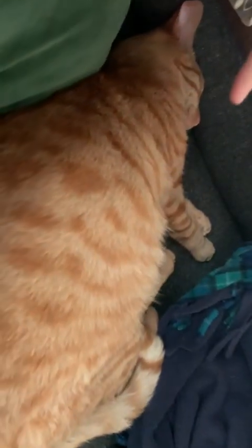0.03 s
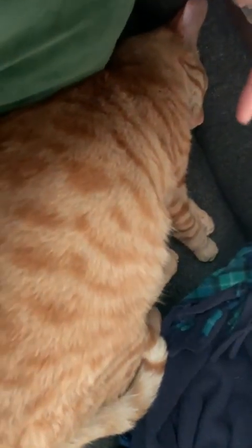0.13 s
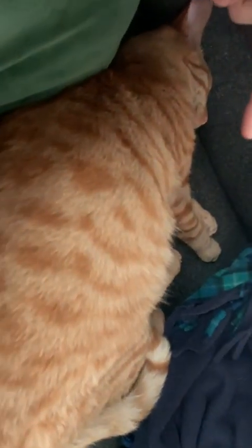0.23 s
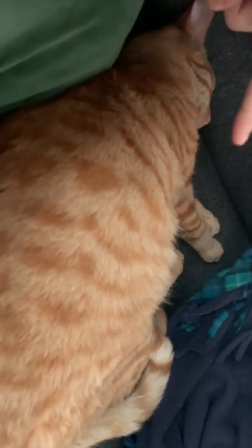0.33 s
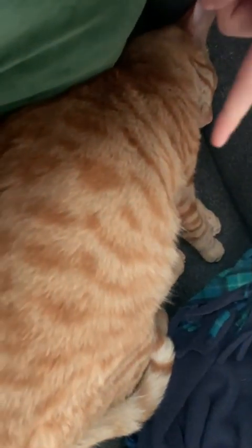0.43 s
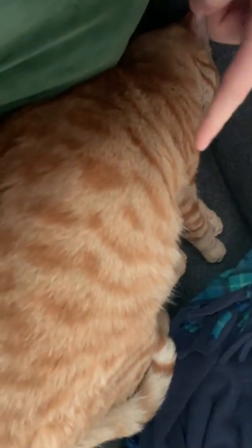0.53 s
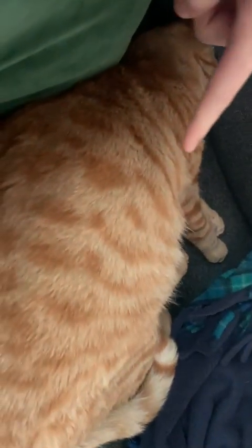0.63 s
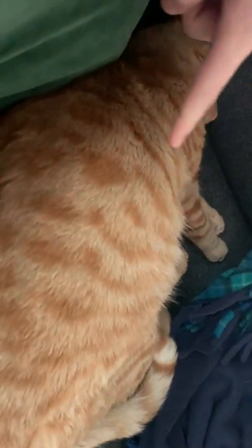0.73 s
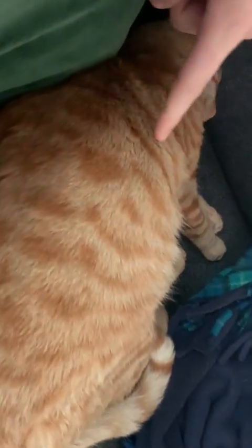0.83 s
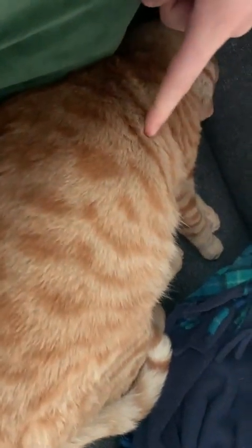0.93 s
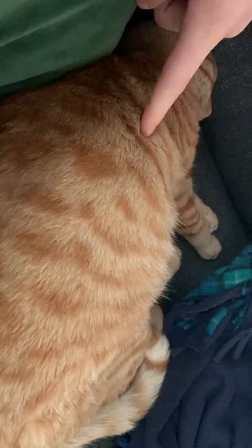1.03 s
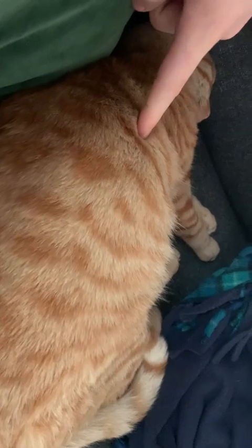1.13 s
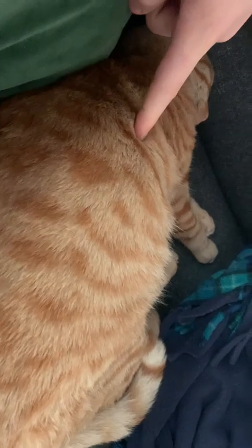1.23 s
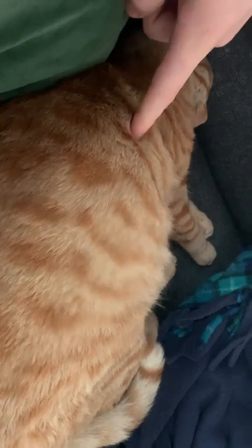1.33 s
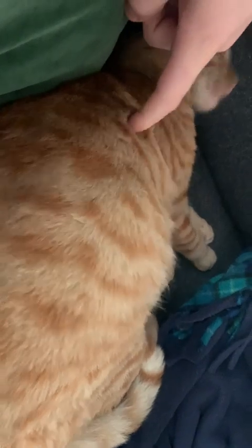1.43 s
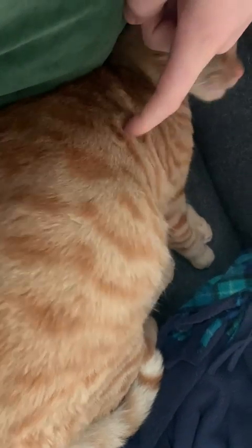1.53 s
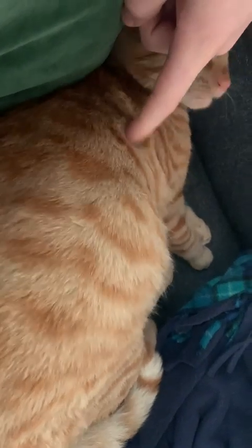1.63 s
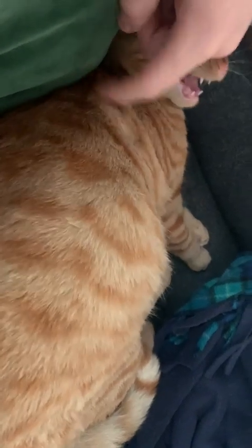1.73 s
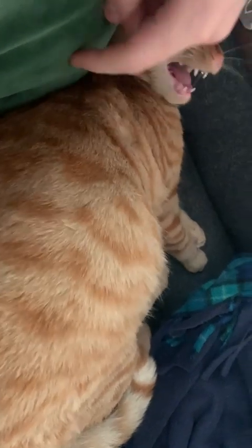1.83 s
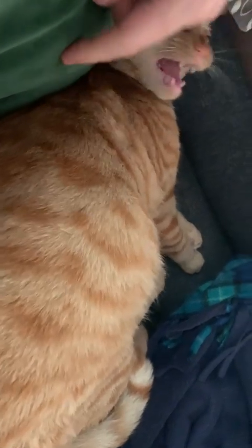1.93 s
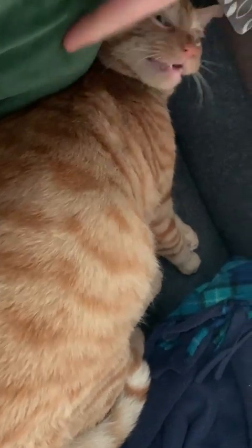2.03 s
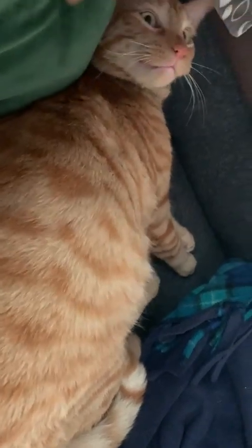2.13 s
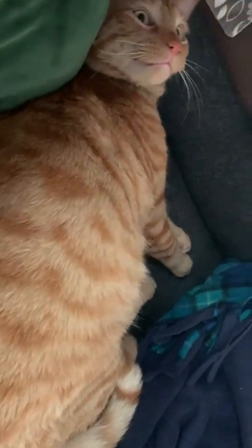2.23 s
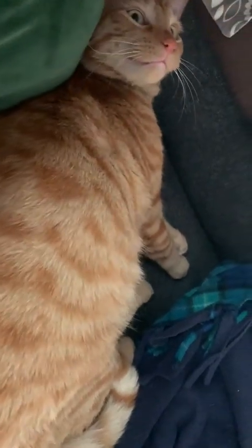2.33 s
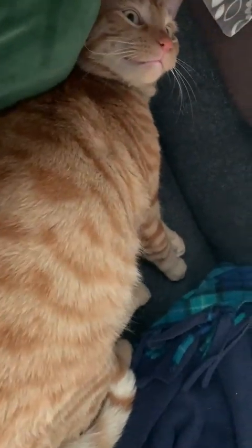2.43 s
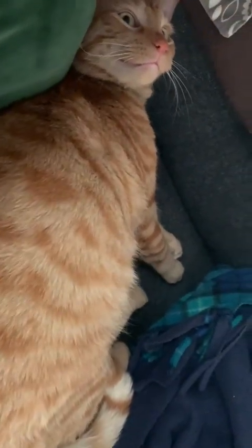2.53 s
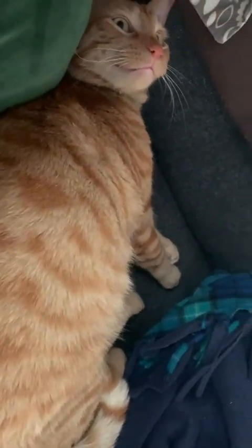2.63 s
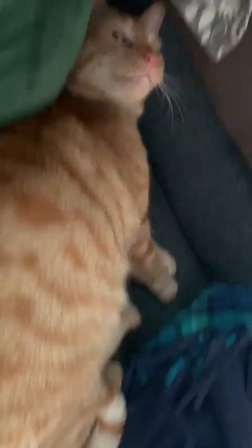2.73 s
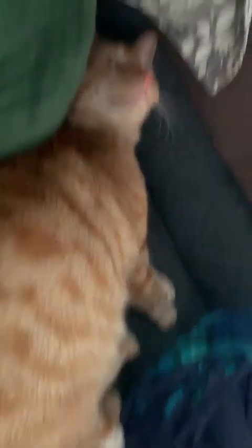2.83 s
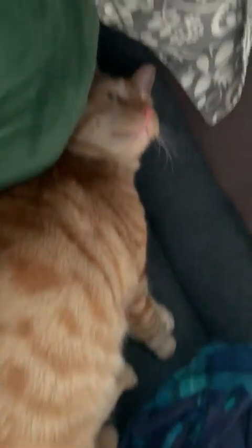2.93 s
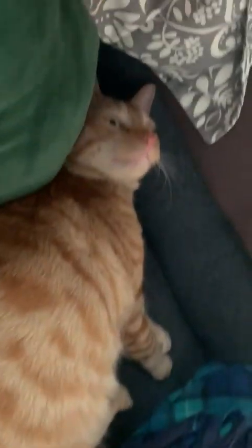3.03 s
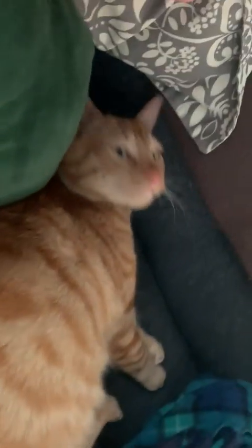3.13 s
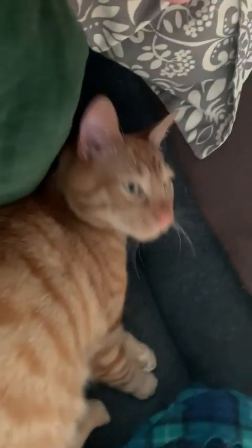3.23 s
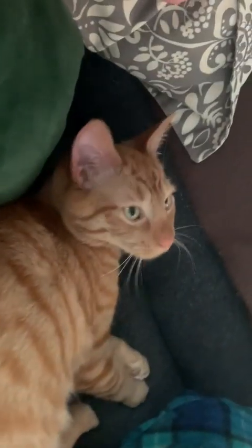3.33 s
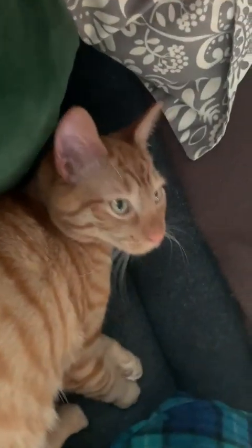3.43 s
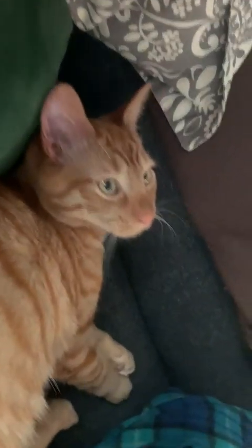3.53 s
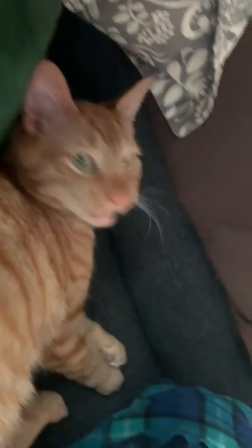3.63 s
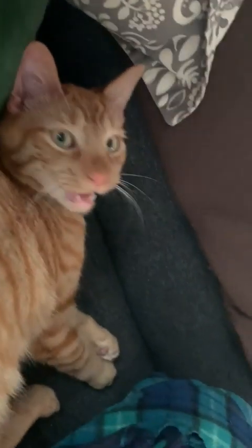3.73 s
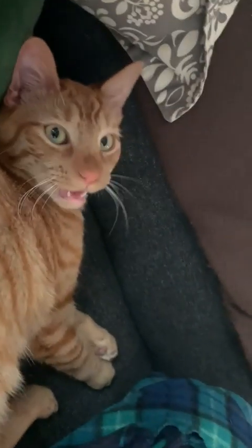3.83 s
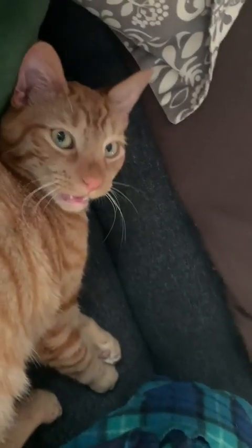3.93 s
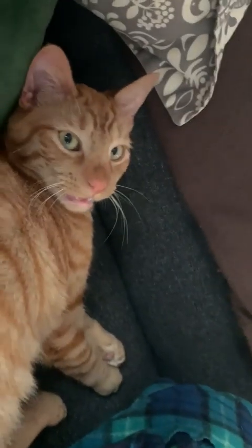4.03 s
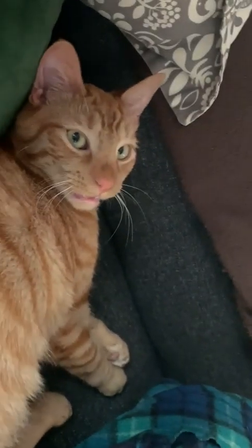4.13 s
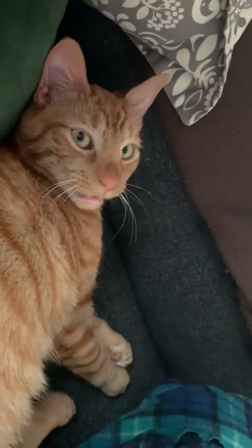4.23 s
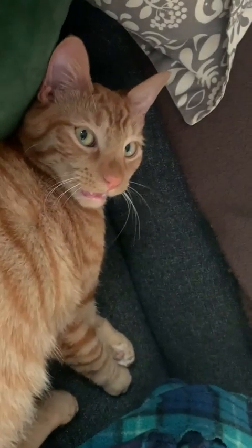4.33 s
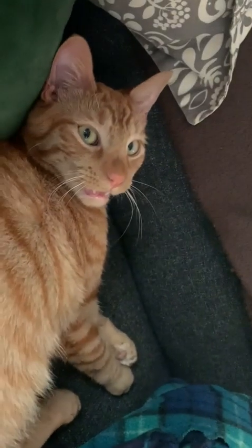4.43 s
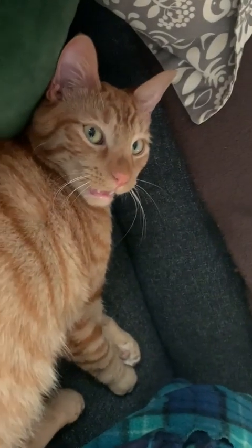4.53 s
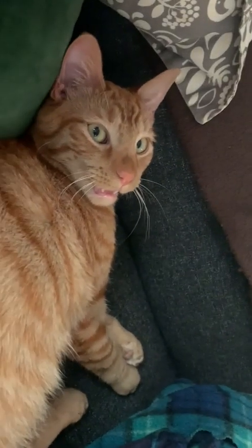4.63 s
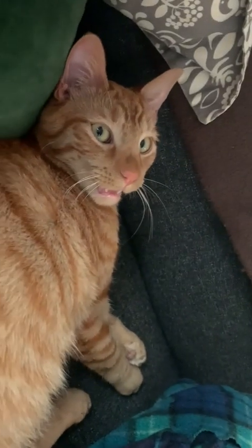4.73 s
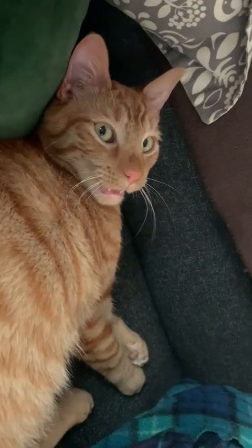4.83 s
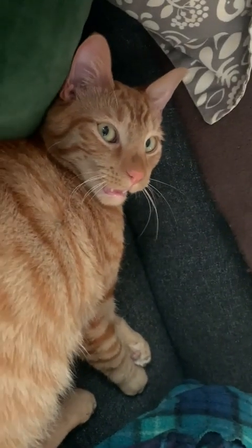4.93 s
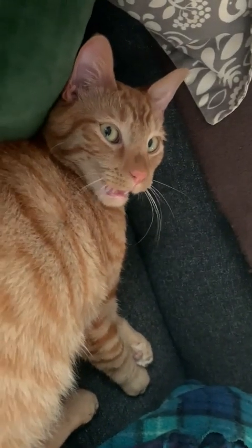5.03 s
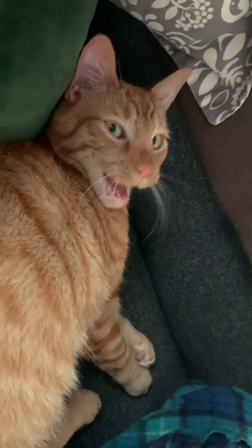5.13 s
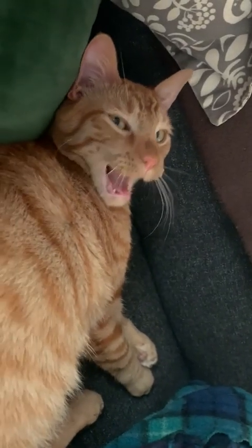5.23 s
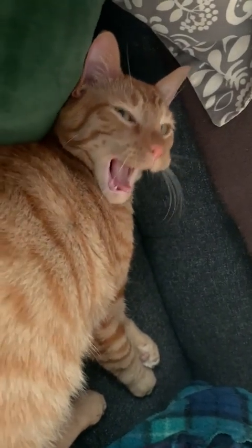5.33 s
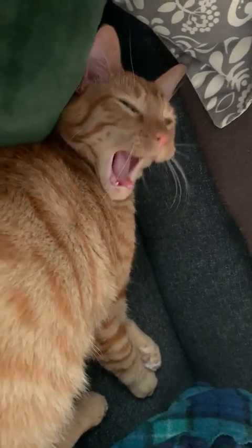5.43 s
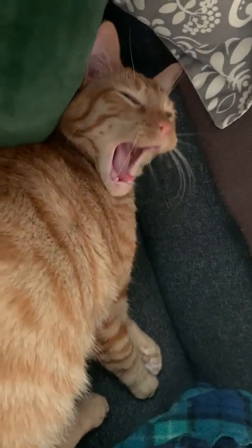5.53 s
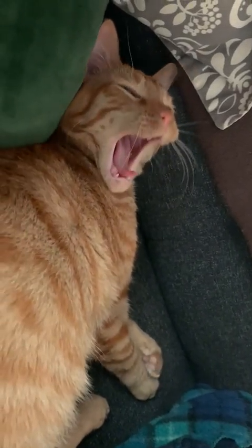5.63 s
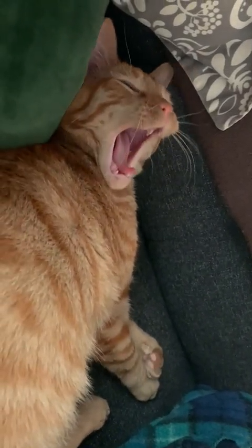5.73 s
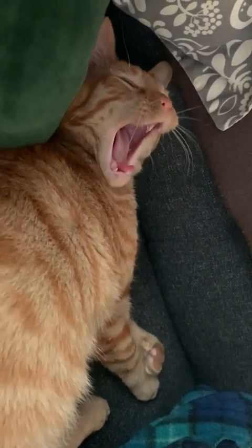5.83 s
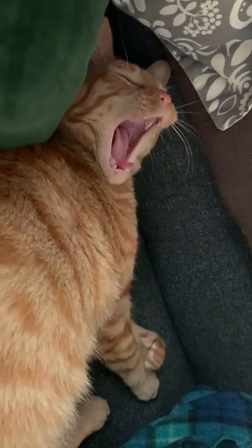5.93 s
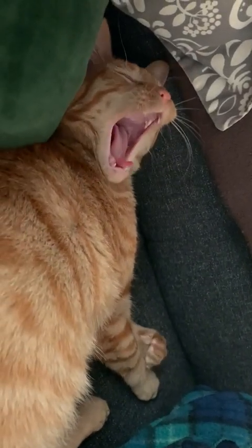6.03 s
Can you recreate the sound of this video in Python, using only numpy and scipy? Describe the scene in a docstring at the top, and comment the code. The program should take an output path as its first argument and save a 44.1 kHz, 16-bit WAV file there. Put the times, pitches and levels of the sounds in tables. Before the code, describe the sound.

A cat gives a soft rolling trill, then several small high squeaks and a thin squeaky yawn, close by in a quietly humming room.

```python
"""Cat poked awake on a sofa.

A fluttering larynx rolls a trill; tight folds give a creaky wavering squeak, short hoarse ones, a clear
squeak and a thin yawning one. Breath hisses past the teeth, the tongue clicks, fur and cloth rustle.
A quiet room hums around a handheld two-port microphone."""
import sys
import numpy as np
from scipy import signal
from scipy.fft import rfft, irfft, next_fast_len
from scipy.io import wavfile
from scipy.ndimage import map_coordinates

SR = 44100
rng = np.random.default_rng(int(sys.argv[2]) if len(sys.argv) > 2 else 0)


def generate_wav(signal):
    """Clip the signal to [-1, 1] and save it as 16-bit WAV at the path in sys.argv[1]."""
    frames = np.transpose(np.atleast_2d(signal))
    scaled = np.clip(frames, -1, 1) * 32767
    pcm = np.round(scaled).astype(np.int16)
    wavfile.write(sys.argv[1], SR, pcm)


N = 268657
TIME = np.arange(N) / SR

# Port response to diffuse sound.
# Each row: frequency in Hz, left over right in dB, left lead in rad, coherence 0-1.
DIFFUSE_PORTS = [(50, 0, 0, .98), (200, -3.3, 0, .95), (350, -5, 0, .7), (500, -6, 1.5, .2),
                 (620, -5, 2.9, .65), (1200, -1.5, 2.5, .65), (1500, -2, .6, .4), (2000, -1.5, 2, .2),
                 (2600, 0, 2.9, .58), (4000, 0, 1.9, .48), (4900, 0, 2.8, .75), (5400, 0, 3.2, .85),
                 (6000, 1, 4.2, .55), (7000, 0, 6.1, .78), (8500, 0, 6.28, .85), (11000, 0, 6.28, .9)]


def trill():
    """The larynx flutters, ever slower. Pitch rises and drops once a roll; the rise is louder, brighter."""
    # Each row: time in seconds, centre pitch in Hz, level in dB, mouth-opening tilt in dB per octave.
    contour = [(1.3, 727, -75, 5), (1.325, 702, -51, -2), (1.38, 653, -49, -2), (1.45, 579, -41.5, -1.5),
               (1.53, 556.6, -37, 0), (1.605, 587, -35.5, 2), (1.625, 646.6, -41, 7), (1.65, 646, -42, 2.5),
               (1.665, 630, -51, -1)]
    # Each row: frequency in Hz, throat gain in dB.
    throat = [(500, -4.5), (700, -12), (1100, 3), (1350, -7), (1750, -10.5), (2200, -20.5), (2650, -22),
              (2950, -42), (3300, -52), (4100, -25), (4800, -44), (7000, -51), (9000, -65)]
    first_peak_s, roll_s, slowing_s, scatter_s = 1.329, .0233, .00057, .001
    span, (centre_hz, db, opening_db) = played(contour)
    n, rolls = len(db), np.arange(-2, 16)
    peaks_s = first_peak_s + roll_s * rolls + slowing_s * rolls * (rolls - 1) / 2
    peaks_s += scatter_s * rng.standard_normal(len(rolls))
    roll_rad = 2 * np.pi * np.interp(TIME[span], peaks_s, rolls)
    shape = np.cos(roll_rad - .45 * (np.cos(roll_rad) - 1))
    swing_hz = np.maximum(47 + 1.1 * (db + 35), 25)  # narrower when soft
    pitch_hz = (centre_hz + swing_hz * shape) * (1 + .0094 * wobble(500, n))
    climb = -np.sin(roll_rad + .091)
    levels_db = [db + along(throat, k * pitch_hz) + 2 * climb
                 + np.log2(k / 2) * (opening_db + climb)
                 + .42 * k * wobble(120, n) for k in range(1, 15)]
    out = np.zeros(N)
    out[span] = fade(harmonics(pitch_hz, levels_db))
    return out


def squeaks():
    """Tight folds give an almost pure tone; hoarseness shakes its pitch and level."""
    # One table a squeak. Each row: time in seconds, pitch in Hz, harmonics 1 and 2 in dB.
    contours = [
        [(1.718, 978, -57, -70), (1.735, 1014, -51, -59), (1.795, 1002, -53, -58.5), (1.806, 1000, -59, -65),
         (1.82, 998, -54, -59), (1.845, 1035, -51, -65), (1.89, 1015, -48, -64), (1.93, 954, -49, -57),
         (1.97, 977, -49, -62), (1.988, 1036, -42, -70), (2.006, 1060, -60, -90)],
        [(3.09, 900, -58, -85), (3.102, 940, -49, -80), (3.122, 966, -64, -80), (3.135, 937, -52, -75),
         (3.16, 870, -64, -83)],
        [(3.54, 781, -58, -85), (3.58, 847, -65, -78), (3.6, 942, -52, -69), (3.62, 1010, -63, -82)],
        [(3.64, 1055, -42, -66), (3.648, 1042, -40.5, -54), (3.667, 1060, -46, -74), (3.68, 1079, -39.5, -64.5),
         (3.705, 1152, -39.5, -62), (3.77, 1197, -40.5, -63.5), (3.84, 1275, -43, -68),
         (3.89, 1237, -42.5, -67), (3.955, 1150, -39.5, -76), (3.99, 1030, -45, -88), (4.005, 1050, -49, -95)],
        [(5.062, 1005, -66, -90), (5.086, 1094, -61, -85), (5.093, 1110, -46, -76), (5.1, 1124, -41.5, -71),
         (5.125, 1185, -43, -63), (5.145, 1215, -45.5, -73), (5.19, 1200, -47.5, -89), (5.26, 1296, -50, -75),
         (5.37, 1466, -60, -73), (5.42, 1487, -64.5, -74), (5.515, 1399, -50.5, -69), (5.62, 1216, -44, -85),
         (5.715, 1142, -49, -85), (5.74, 1140, -68, -89)],
    ]
    # Each row: hoarseness 0-1 at start and end, harmonic 3 and harmonics 4-9 in dB relative to harmonic 2.
    voices = [(.36, .05, -12, -25), (0.44, 0.7, -12, -18), (0.48, 0.86, -6, -28),
              (0.033, 0.031, -6.5, -11.5), (.04, 0.034, -10, -27)]
    # Voice cracks. Each row: start and hold in seconds, pitch drop in Hz, drop and recovery in seconds.
    cracks = [(1.781, 0.0203, 100, 0.0038, .008), (1.864, .004, 85, 0.0055, 0.038)]
    # Each row: frequency in Hz, throat gain on harmonics 4-9 in dB.
    throat = [(4300, 8), (4900, -10), (6200, 2.5), (7200, -2.5), (8300, -11), (9500, -12), (11000, -34)]
    pressed_db_per_hz, clearing_per_hz = .0893, .0082  # a crack brightens and clears the voice
    shut_db, opening_s = -19, .045  # high harmonics arrive as the mouth opens
    crack_hz = sum(hz * swell(s, held, drop, recovery) for s, held, hz, drop, recovery in cracks)
    out = np.zeros(N)
    for contour, (hoarse_start, hoarse_end, third_db, upper_db) in zip(contours, voices):
        span, (pitch_hz, first_db, second_db) = played(contour)
        n, drop_hz = len(pitch_hz), crack_hz[span]
        hoarse = np.clip(np.linspace(hoarse_start, hoarse_end, n) * (1 - clearing_per_hz * drop_hz), 0, 1)
        jitter = .0036 * wobble(100, n) + .13 * hoarse * wobble(700, n)
        pitch_hz = (pitch_hz - drop_hz) * (1 + jitter)
        pressed_db = pressed_db_per_hz * drop_hz
        mouth_db = shut_db * np.clip(1 - TIME[:n] / opening_s, 0, 1)
        lower = [first_db + .78 * wobble(71, n),
                 second_db + pressed_db + 2.8 * wobble(60, n) + 1.5 * wobble(25, n),
                 second_db + third_db + 2 * pressed_db + 3 * wobble(60, n)]
        upper = [second_db + upper_db + mouth_db + along(throat, k * pitch_hz)
                 + 4 * wobble(26.4, n) + 4 * wobble(200, n) for k in range(4, 10)]
        shimmer = amp(6.4 * hoarse * wobble(400, n))
        out[span] = fade(shimmer * harmonics(pitch_hz, lower + upper))
    return out


def creak():
    """Uneven slaps of the folds and air leaking past them ring the throat."""
    # Each row: start and hold in seconds, drive in dB, rise and fall in seconds, slaps a second,
    # air share 0-1.
    bouts = [(1.38, .1, -62, .16, .2, 290, .99), (1.63, 0.017, -54, 0.14, 0.019, 295, 1),
             (1.655, 0.048, -51.5, .03, .005, 220, .2), (1.724, 0.067, -53.5, 0.012, .02, 270, .55),
             (1.801, 0.026, -45.5, .008, .06, 300, 0.1), (1.86, .04, -58, .05, .045, 370, 0.7),
             (3.588, .017, -57.5, .005, 0.016, 200, 0.1)]
    # Each row: centre and width in Hz, gain in dB.
    throat_modes = [(1090, 620, 1), (2050, 1330, 3.5), (2600, 900, 4.5), (4030, 920, -11.5)]
    starts_s, rates_hz = np.transpose(bouts)[[0, 5]]
    slap_hz = np.interp(TIME, starts_s, rates_hz) * amp(3.5 * wobble(200))
    slap_count = np.floor(np.cumsum(slap_hz) / SR)
    slaps = unit(np.diff(slap_count, prepend=0) * amp(2.8 * rng.standard_normal(N)))
    leak = rng.standard_normal(N)
    drive = sum(amp(db) * swell(s, held, rise, fall) * (np.sqrt(air) * leak - np.sqrt(1 - air) * slaps)
                for s, held, db, rise, fall, _, air in bouts)
    return 4 * filtered(drive, lambda hz: resonant(throat_modes)(hz) / (1 + 1j * hz / 3000))


def clicks():
    """A wet tongue or lip contact lets go: two mouth cavities ring briefly."""
    # Each row: start in seconds, relative level in dB, bright ring in Hz, its T60 in seconds,
    # low ring in Hz, low over bright in dB.
    releases = [(2.709, -61, 6840, 0.0029, 4270, 4), (3.0379, -57, 7240, 0.0049, 2700, -20),
                (3.569, -55, 8500, 0.0053, 3700, 1), (3.5714, -35.5, 7580, 0.0035, 2180, -21),
                (3.5775, -43, 5600, .004, 2680, -16), (3.6346, -40, 8270, 0.0026, 3390, -11),
                (4.4938, -36.5, 7260, 0.0011, 3170, -24), (5.089, -50.5, 10100, 0.0056, 3020, 7)]
    low_t60_s, attack_s, cutoff_hz = .0077, .00018, 12000
    out, t = np.zeros(N), np.arange(SR // 50) / SR
    for s, db, bright_hz, t60_s, low_hz, low_db in releases:
        grit = .17 * rng.standard_normal(len(t))
        bright = amp(-60 * t / t60_s) * (np.sin(2 * np.pi * bright_hz * t) + grit)
        low = amp(low_db - 60 * t / low_t60_s) * np.sin(2 * np.pi * low_hz * t)
        out[round(s * SR):][:len(t)] += amp(db + 6) * (bright + low) * (1 - np.exp(-t / attack_s))
    return filtered(out, lambda hz: 1 / (1 + 1j * hz / cutoff_hz - (hz / cutoff_hz) ** 2))


def breath():
    """Air hisses past the teeth."""
    # Each row: start and hold in seconds, level in dB, rise and fall in seconds.
    puffs = [(1.365, .002, -66.5, .03, .07), (1.47, .22, -72, .1, .1), (1.78, 0.029, -59, 0.081, 0.069),
             (1.865, 0.036, -55, .08, .04), (1.93, .05, -65.5, .05, .17), (3.045, .002, -81, .04, .03),
             (3.165, .002, -75.5, .11, .07), (3.578, .002, -61, 0.032, 0.011), (3.59, .08, -80, .02, .4),
             (3.65, .002, -66, 0.034, .025), (4.01, .04, -81, .06, 0.11), (5.13, .002, -81, .04, .04),
             (5.37, .23, -82, 0.093, .35)]
    # Each row: centre and width in Hz, relative gain in dB. Applied twice.
    teeth_modes = [(7100, 1200, -3.5), (4160, 950, -6)]
    air = unit(filtered(rng.standard_normal(N), lambda hz: resonant(teeth_modes)(hz) ** 2))
    air *= amp(2.6 * wobble(40.25))
    return air * sum(amp(db) * swell(s, held, rise, fall) for s, held, db, rise, fall in puffs)


def rustle():
    """Fur and cloth fibres slide over each other in small uneven bursts."""
    # Each row: start and hold in seconds, fur in dB, rise and fall in seconds, cloth over fur in dB.
    strokes = [(0, .95, -84.5, .1, .2, 16), (.4, .01, -79.5, 0.14, 0.12, 8),
               (1.35, .3, -79, 0.22, 0.25, 10), (1.85, 0.578, -74, 0.14, .045, 15),
               (1.76, 0.17, -72, .06, 0.084, -5), (2, 0.14, -61.5, .2, 0.18, -8),
               (2.71, .005, -84.5, 0.14, .05, 25)]
    # Each row of both: frequency in Hz, relative density in dB.
    fur_spectrum = [(3000, -22), (6000, 2), (8000, 1), (11000, -4), (14000, -9), (16000, -3.5)]
    cloth_spectrum = [(300, -8), (1000, 5.5), (2000, -5.5), (3300, -3.5), (4200, -7.5), (5300, -5.5),
                      (7000, -14.5), (9000, -31), (12000, -31)]
    fur, cloth = diffuse(fur_spectrum), diffuse(cloth_spectrum)
    friction = sum(amp(db) * swell(s, held, rise, fall) * (fur + amp(cloth_db) * cloth)
                   for s, held, db, rise, fall, cloth_db in strokes)
    return amp(2.1 * wobble(18) + 1.9 * wobble(300)) * friction


def echoes(x):
    """Soft furnishings give a short tail, different at each port."""
    t60_s, t = .078, np.arange(SR // 5) / SR
    tail = rng.standard_normal((2, len(t))) * amp(-60 * t / t60_s)
    return signal.fftconvolve(x[None], tail / np.linalg.norm(tail[0]), axes=1)[:, :N]


def room():
    """Air handling rumbles under wavering appliance tones; the bass swells and sinks."""
    # Each row: frequency in Hz, relative density in dB.
    air_spectrum = [(20, -102), (40, -82.5), (60, -73.5), (100, -70.5), (190, -70.5), (260, -78),
                    (350, -76.5), (600, -84), (800, -85), (1200, -88.5), (2000, -97), (3000, -104),
                    (4300, -107), (5500, -115), (8000, -119), (11000, -122), (15500, -128)]
    # Each row: frequency and width in Hz, level in dB, left lead in rad.
    hums = [(60.2, 12, -54.5, 0), (214.34, 10, -55, 0.013), (450, 16.8, -63.5, 0), (1504, 76, -68, 1.24)]
    # Each row: time in seconds, relative bass level in dB.
    bass_contour = [(0, -50), (.93, -50.5), (1.61, -48.5), (2.05, -50), (2.36, -47), (2.75, -51),
                    (3.76, -49.5), (4.82, -49), (5.05, -49.5), (6.09, -49)]
    out = amp(-47) * diffuse(air_spectrum)
    for hz, width_hz, db, lead_rad in hums:
        tone = unit(filtered(rng.standard_normal(N), lambda f: resonant([(hz, width_hz, 0)])(f) ** 2))
        out += amp(db) * filtered(tone, lambda f: ports(along(DIFFUSE_PORTS, f)[0], lead_rad))
    times_s, bass_db = np.transpose(bass_contour)
    bass_gain = amp(np.interp(TIME, times_s, bass_db - np.mean(bass_db)))
    bass = filtered(out, lambda f: 1 / (1 + (f / 350) ** 4))
    return out + bass * (bass_gain - 1)


def motor_whine():
    """A thin tone, nearly antiphase at the ports; the lead shifts as the microphone moves."""
    # Each row: time in seconds, pitch in Hz, level in dB, left lead in rad.
    contour = [(0, 684, -58.5, 2.6), (1.2, 686.5, -60.5, 2.84), (2.7, 679.4, -58, 3.1),
               (3.1, 683.3, -55, 2.36), (6.09, 684, -54.5, 3.54)]
    times_s, *columns = np.transpose(contour)
    hz, db, lead_rad = [np.interp(TIME, times_s, c) for c in columns]
    phase = 2 * np.pi * np.cumsum(hz + 1.55 * wobble(6)) / SR
    return np.sqrt(2) * amp(db + 1.7 * wobble(9.3)) * np.real(ports(-5.5, lead_rad) * np.exp(1j * phase))


def diffuse(spectrum):
    """Stereo noise from all around, rms 1; a common and an opposed part set the coherence."""
    m = next_fast_len(N)
    hz = np.fft.rfftfreq(m, 1 / SR)
    tilt_db, lead_rad, coherence = along(DIFFUSE_PORTS, hz)
    mix_rad = np.arccos(np.clip(coherence, 0, 1)) / 2
    common, opposed = rfft(rng.standard_normal((2, m))) * [np.cos(mix_rad), np.sin(mix_rad)]
    response = amp(along(spectrum, hz)) * ports(tilt_db, lead_rad)
    return unit(irfft(response * [common + opposed, common - opposed], m)[:, :N])


def ports(tilt_db, lead_rad):
    """Left and right responses for a level difference and a phase lead."""
    return np.array([amp(tilt_db / 2) * np.exp(.5j * lead_rad),
                     amp(-tilt_db / 2) * np.exp(-.5j * lead_rad)])


def amp(db):
    return 10 ** (np.asarray(db) / 20)


def unit(x):
    return x / np.sqrt(np.mean(x ** 2) + 1e-20)


def along(points, hz):
    """Columns after the frequency, interpolated on a log axis."""
    f, *columns = np.transpose(points)
    return np.squeeze([np.interp(np.log(hz + 1), np.log(f + 1), c) for c in columns])


def played(rows):
    """The sample span of a contour, and its columns interpolated over it."""
    s, *columns = np.transpose(rows)
    span = slice(round(s[0] * SR), round(s[-1] * SR))
    return span, [np.interp(TIME[span], s, c) for c in columns]


def wobble(rate_hz, count=N):
    """Smooth random curve with knots at rate_hz."""
    knots = rng.standard_normal(int(count * rate_hz / SR) + 4)
    return map_coordinates(knots, [TIME[:count] * rate_hz])


def swell(start_s, held_s, rise_s, fall_s):
    """Gain 1 while held, 20 dB lower one rise time before and one fall time after."""
    outside = np.maximum((start_s - TIME) / rise_s, (TIME - start_s - held_s) / fall_s)
    return amp(-20 * np.maximum(0, outside))


def fade(x):
    return x * signal.windows.tukey(len(x), min(1, .0072 * SR / len(x)))


def harmonics(pitch_hz, levels_db):
    phase = 2 * np.pi * np.cumsum(pitch_hz) / SR
    return np.sqrt(2) * sum(amp(db) * np.cos(k * phase + 2.37) for k, db in enumerate(levels_db, start=1))


def resonant(modes):
    """Causal response of parallel resonances, alternating in sign."""
    return lambda f: sum((-1) ** k * amp(db) * 1j * f * width / (hz * hz - f * f + 1j * f * width)
                         for k, (hz, width, db) in enumerate(modes))


def filtered(x, response):
    """x through a complex frequency response."""
    m = next_fast_len(N + 8192)
    return irfft(rfft(x, m) * response(np.fft.rfftfreq(m, 1 / SR)), m)[..., :N]


def scene():
    """The cat close to the ports, over rustle and room."""
    # Each row: frequency in Hz, left over right in dB, left lead in rad.
    near_ports = [(570, -9, -.5), (950, -3, .5), (1200, -1, .1), (1450, 1, 0), (1800, -6, .7),
                  (2500, -3, 1.2), (3300, -2, 1.6), (4100, 1, 1.4), (5300, 0, 3.1), (5900, 0, 4.3),
                  (6700, 0, 6), (7500, 0, 6.28)]
    cat = trill() + squeaks() + creak() + clicks() + breath()
    direct = filtered(cat, lambda hz: ports(*along(near_ports, hz)))
    return direct + amp(-12.5) * echoes(cat) + rustle() + room() + motor_whine()


def record(dry):
    """The microphone chain passes nothing above its band limit."""
    return filtered(dry, lambda hz: hz < 15750)


dry = scene()
out = record(dry)
generate_wav(out)
```